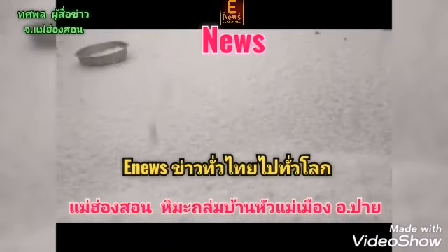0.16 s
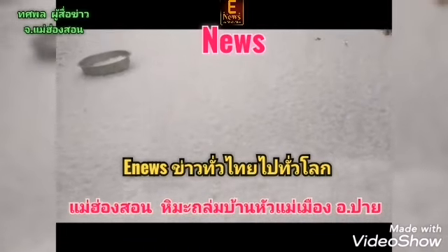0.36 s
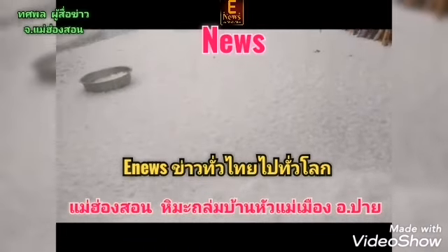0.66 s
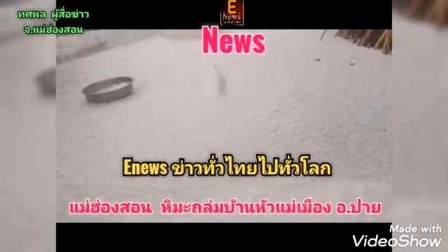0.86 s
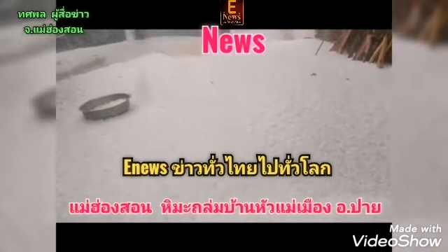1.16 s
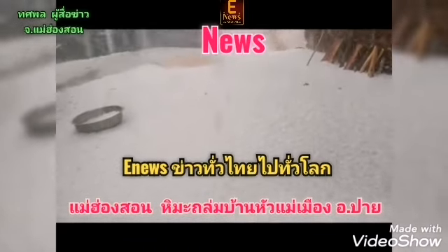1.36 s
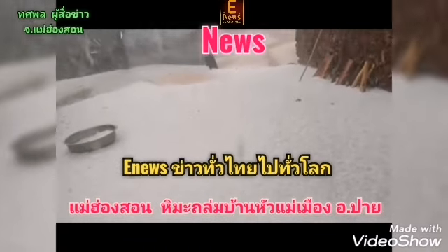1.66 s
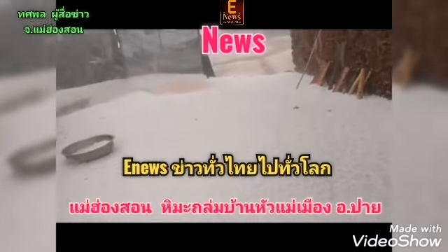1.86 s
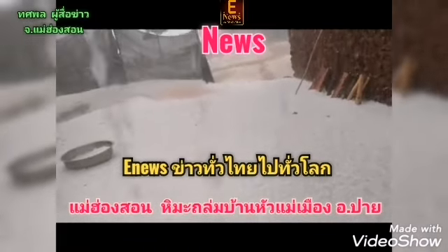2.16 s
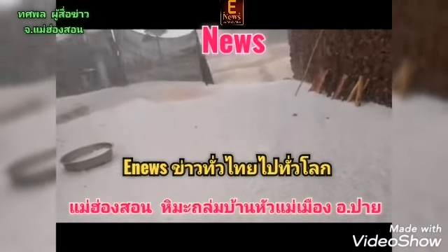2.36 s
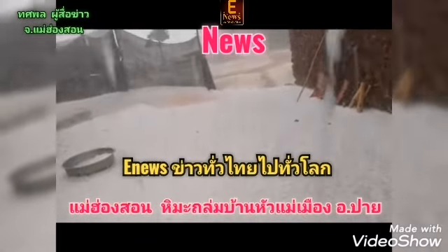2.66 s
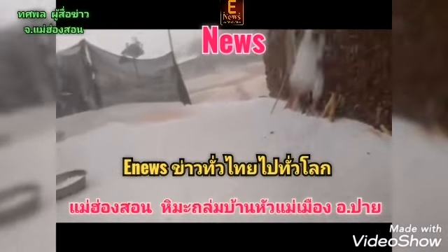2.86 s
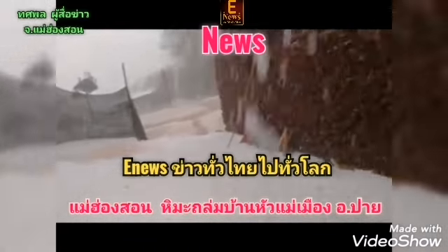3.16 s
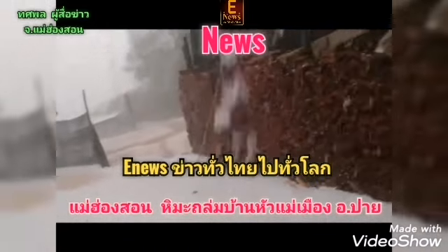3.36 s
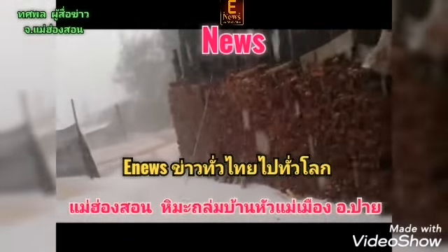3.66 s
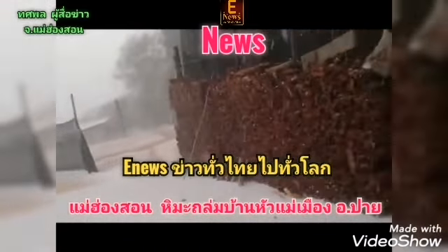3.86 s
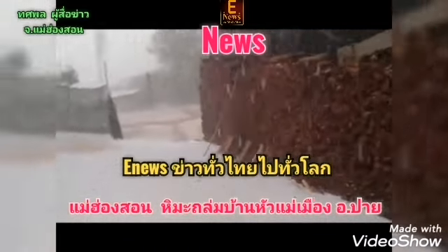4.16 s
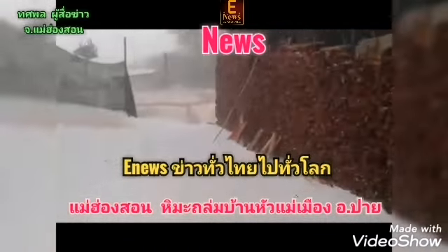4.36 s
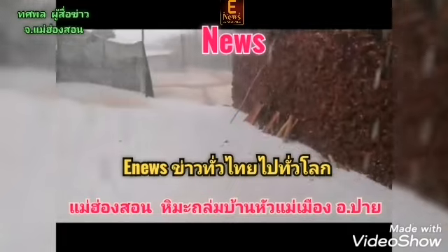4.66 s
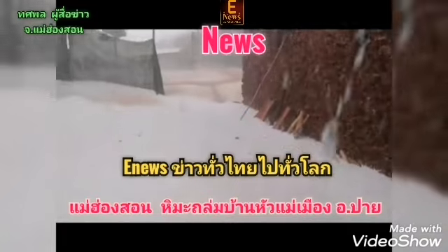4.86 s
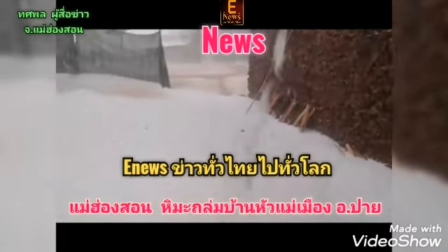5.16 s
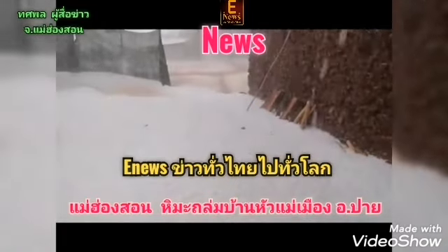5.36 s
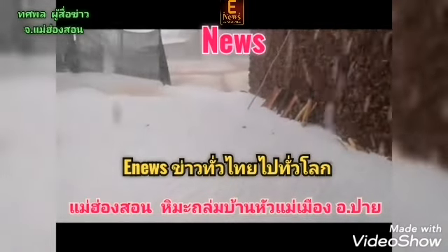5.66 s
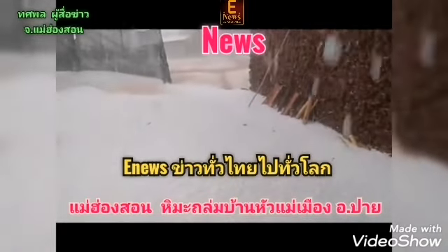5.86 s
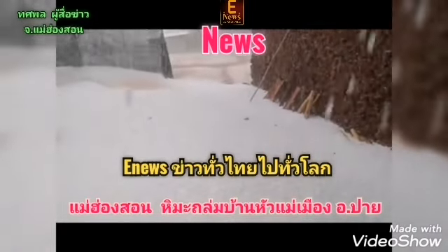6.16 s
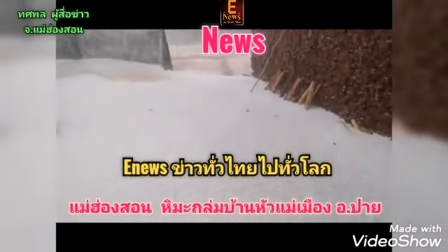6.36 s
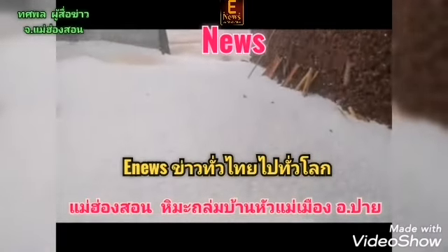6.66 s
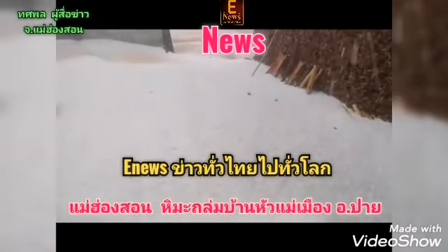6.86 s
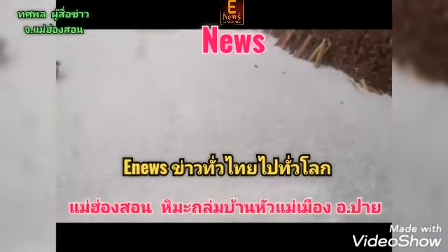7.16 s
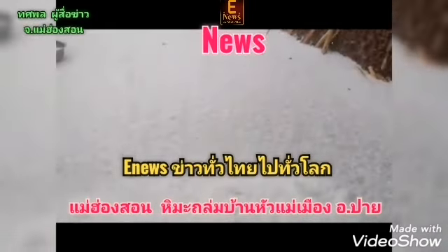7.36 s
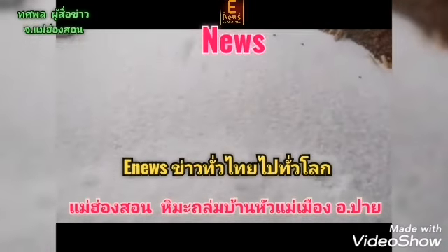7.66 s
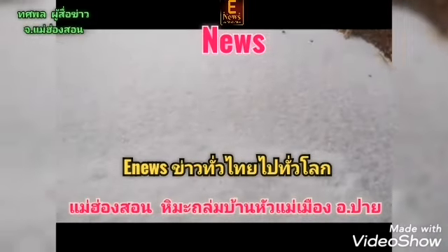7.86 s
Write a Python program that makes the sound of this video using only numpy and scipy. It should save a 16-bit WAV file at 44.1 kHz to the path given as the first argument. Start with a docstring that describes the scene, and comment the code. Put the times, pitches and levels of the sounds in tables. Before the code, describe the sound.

Heavy rain and hail hammer a corrugated metal roof, heard close from under the eave in a village yard. Countless stones merge into a loud, bright roar over a softer low drumming of the panels. Bigger stones stand out now and then as brief clatters and short metallic pings. Water and slush run off the roof and splatter on the hail below. The downpour holds a steady level throughout.

```python
"""A village yard, under the eave of a corrugated roof pelted by heavy rain and hail.
Thousands of stones a second make the sheets ring in one bright roar over a low drumming of the panels.
Volleys of bigger stones and single pings stand out. Water running off the roof splatters onto the hail
lying below, with clumps of slush and puffs of spray. A phone's gain control evens out the loudness."""
import sys
import numpy as np
from scipy import signal
from scipy.fft import rfft, irfft
from scipy.io import wavfile
from scipy.ndimage import uniform_filter1d

SR = 44100
rng = np.random.default_rng(int(sys.argv[2]) if len(sys.argv) > 2 else 0)


def transcribe(signal):
    """Save signal, clipped to [-1, 1], as a 16-bit WAV file at the path in sys.argv[1]."""
    frames = np.atleast_2d(signal).T
    limited = np.clip(frames, -1, 1)
    pcm = np.round(limited * 32767).astype(np.int16)
    wavfile.write(sys.argv[1], SR, pcm)


N = 352800  # 8 seconds
TIME = np.arange(N) / SR  # seconds at each sample


def undb(db):
    """Turn decibels (dB) into a number to multiply a sound by."""
    return 10 ** (np.asarray(db) / 20)


def unit(x):
    """Scale a signal so that its average power is 1."""
    return x / np.sqrt(np.mean(x ** 2))


def curve(table):
    """Join (seconds, value) points with straight lines, giving one value a sample."""
    seconds, values = np.transpose(table)
    return np.interp(TIME, seconds, values)


def drift(rate_hz):
    """A smooth random wobble of typical size 1 that swings up to about rate_hz times a second."""
    freqs = np.arange(N // 2 + 1) * SR / N
    return unit(irfft(rfft(rng.standard_normal(N)) / (1 + (freqs / rate_hz) ** 4), N))


def colour(x, points):
    """Make each frequency louder or softer, following (Hz, dB) points."""
    hz, db = np.transpose(points)
    freqs = np.maximum(np.arange(N // 2 + 1) * SR / N, 1)
    gain = undb(np.interp(np.log(freqs), np.log(hz), db))
    return irfft(rfft(x) * gain, N)


def resonate(x, hz, width_hz):
    """Keep the sound near one pitch; the narrower the width, the longer it rings."""
    b, a = signal.iirpeak(hz, hz / width_hz, fs=SR)
    return signal.lfilter(b, a, signal.lfilter(b, a, x))


def impacts(per_s, spread_db):
    """Clicks at random moments: with a positive spread many are small and a few large; with a negative spread
    most are full size and a few smaller."""
    hits = rng.random(N) < per_s / SR
    size = undb(spread_db * np.minimum(rng.exponential(size=N), 5))
    return unit(hits * size * rng.standard_normal(N))


def stereo(mid, side):
    """Left and right channels: both share mid, and side makes them differ."""
    return np.array([mid + side, mid - side])


def roof_roar():
    """Hail rings the metal sheets; where a stone lands decides which pitches it stirs."""
    # The broad tones of a struck sheet. Each row: pitch in Hz, width in Hz, relative level in dB.
    sheet_tones = [(1013, 475, -7), (1437, 770, -6.5), (1994, 810, 0.14), (2225, 330, -1.5),
                   (2463, 510, 0.04), (2703, 830, -2.5), (3730, 1590, -15)]
    roar = 0
    for hz, width_hz, db in sheet_tones:
        # each tone comes from its own stretch of roof, where flurries come and go
        flurry = undb(0.52 * drift(rate_hz=16))
        roar += undb(db) * flurry * resonate(impacts(per_s=18000, spread_db=0.54), hz, width_hz)
    # hard ice on metal also gives a short, bright crack
    cracks = resonate(impacts(per_s=10000, spread_db=4.0), hz=5400, width_hz=3300)
    return unit(roar) + undb(-32.5) * unit(cracks)


def small_stones(count, ring_samples):
    """Small stones each ring their own spot of roof: low ones knock, high ones ping."""
    # How strongly the roof rings at each pitch. Each row: pitch in Hz, relative level in dB.
    ring_levels = [(200, -19.5), (500, -17), (800, -14), (1050, -8.5), (1600, -6.5), (2000, -1), (2450, -1),
                   (2800, -4.5), (3400, -12)]
    pitches, levels = np.transpose(ring_levels)
    out = np.zeros(N + ring_samples)
    age = np.arange(ring_samples) / SR
    for when, where, strength in rng.random((count, 3)):
        start = int(when * N)
        hz = pitches[0] + where * (pitches[-1] - pitches[0])
        decay_s = 24 / max(hz, 1200)  # fades to about a third in 24 cycles, or 0.02 s at most
        ring = np.exp(-age / decay_s) * np.sin(2 * np.pi * hz * age)
        out[start:start + ring_samples] += undb(np.interp(hz, pitches, levels)) * strength * ring
    return unit(out[:N])


def drumming():
    """The heavier stones shake whole panels and the frame under them."""
    # How the panels and frame respond. Each row: frequency in Hz, relative level in dB.
    frame_response = [(15, 0), (42, -9.5), (76, -2.5), (95, -6.5), (115, -4), (160, -4), (230, -2),
                      (370, 0.5), (450, 0), (600, 1), (800, 1), (1300, -7.5), (3000, -48)]
    swell = undb(0.5 * drift(rate_hz=6))
    return unit(colour(swell * impacts(per_s=7000, spread_db=0.9), frame_response))


def splatter():
    """Water leaves the eave unevenly and bursts into droplets; the treble flickers band by band."""
    # The hiss of slush and water hitting the ground.
    # Each row: low edge in Hz, high edge in Hz, relative level in dB, amount of flicker in dB.
    splash_bands = [(4000, 4940, -7.5, 8.5), (4900, 5910, -4.5, 3), (5890, 7100, -5.5, 3.5),
                    (7210, 8210, -4.5, 2.5), (8130, 9000, -16.5, 13), (9180, 11040, -18, 9.5),
                    (10980, 12550, -17, 8.5)]
    # How much water runs off the eave. Each row: time in seconds, relative level in dB.
    runoff = [(0.0, -32), (1.16, -32.5), (1.8, -31.5), (2.56, -32), (4.4, -31.5), (4.84, -31.5),
              (5.12, -33), (5.36, -33), (5.96, -33), (6.2, -31.5), (8.0, -32)]
    wide_above_hz = 4100  # only the treble differs between the ears
    # near 2.84 s a thick stream pours close by, making the splatter duller and louder
    pour = np.exp(-((TIME - 2.84) / 0.41) ** 2)
    tilt_db = -0.5 + 4.5 * (TIME * SR / N) ** 2 - pour  # per octave: the splatter grows finer with time
    surge_db = 0.48 * drift(rate_hz=51)
    mid, side = 0, 0
    for low_hz, high_hz, db, flicker_db in splash_bands:
        band = signal.butter(6, [low_hz, high_hz], "band", fs=SR, output="sos")
        ahead = unit(signal.sosfilt(band, impacts(per_s=22000, spread_db=2.0)))
        around = unit(signal.sosfilt(band, impacts(per_s=22000, spread_db=2.0)))
        octaves = np.log2(low_hz / wide_above_hz)
        width = undb(min(-3 + 2.5 * octaves, -1.5))  # higher bands sound wider, up to a limit
        flicker = np.minimum(drift(rate_hz=22), 1)  # dips further than it rises
        gain = undb(db + tilt_db * (octaves - 1) + surge_db + flicker_db * flicker) / np.hypot(1, width)
        mid += gain * ahead
        side += gain * width * around
    treble_only = signal.ellip(10, .2, 80, wide_above_hz, "high", fs=SR, output="sos")
    level_db = curve(runoff) - 3 + 0.8 * pour
    return undb(level_db) * stereo(mid, signal.sosfilt(treble_only, side))


def sizzle():
    """A thin, steady sizzle at the very top of the hiss, partly different in each ear."""
    mid, side = (unit(resonate(rng.standard_normal(N), hz=12410, width_hz=50)) for _ in range(2))
    return undb(-50) * stereo(mid, undb(-1) * side)


def slush_clumps():
    """A lump of slush collapses into a short burst of droplets; finer ones sound higher."""
    # Clumps landing close by. Each row: time in seconds, pitch in Hz, level in dB.
    clumps = [(.04, 6000, -37.5), (.365, 4700, -34), (.586, 5800, -34), (1.28, 4000, -34),
              (1.467, 6200, -34), (1.607, 4000, -37), (1.942, 5500, -42), (2.04, 3900, -36),
              (2.615, 4600, -31), (2.722, 5200, -34), (3.0, 5900, -37), (3.167, 4000, -35),
              (3.39, 5500, -33), (3.686, 4900, -32), (4.573, 6000, -37), (4.8, 4200, -35),
              (5.345, 5200, -33), (5.352, 7800, -38), (5.393, 6200, -35.5), (6.202, 5700, -36.5),
              (6.532, 4200, -33), (6.85, 3900, -35), (6.976, 5670, -35), (7.25, 6200, -40),
              (7.425, 4000, -33), (7.943, 5200, -35)]
    lead_s, rise_s = 0.0074, 0.012
    out = np.zeros(N)
    for time_s, hz, db in clumps:
        age = np.maximum(TIME - time_s + lead_s, 0) / rise_s
        droplets = unit(resonate(impacts(per_s=4000, spread_db=0.5), hz, width_hz=1800))
        out += undb(db) * age * np.exp(1 - age) * droplets
    return out


def volleys():
    """A bunch of big stones lands on one sheet within a few hundredths of a second and rings it."""
    # Bunches of big stones. Each row: middle of the bunch in seconds, pitch in Hz, level in dB.
    bunches = [(0.048, 2500, -17.5), (0.168, 2800, -23), (0.384, 3300, -28.5), (0.48, 2150, -23),
               (0.514, 2530, -16), (1.3, 2420, -24), (1.72, 2380, -23), (1.618, 2756, -22),
               (1.994, 2300, -22), (2.03, 1500, -22), (2.048, 3140, -25), (2.518, 2080, -23),
               (2.545, 3300, -30), (2.587, 2400, -31), (2.739, 2400, -19), (2.93, 1950, -17),
               (3.228, 2350, -22), (3.57, 2270, -18.5), (3.735, 2360, -19), (3.95, 3300, -27),
               (4.0, 2800, -25), (4.059, 3020, -28.5), (4.155, 2050, -19), (4.519, 2540, -24),
               (4.616, 2454, -20), (5.0, 2400, -25), (5.02, 3280, -30), (5.357, 3300, -28),
               (5.641, 2530, -24), (6.229, 2160, -21), (6.596, 3280, -33)]
    half_length_s = 0.02
    out = np.zeros(N)
    for middle_s, hz, db in bunches:
        swell = np.exp(-((TIME - middle_s) / half_length_s) ** 2)
        ringing = unit(resonate(impacts(per_s=3000, spread_db=-0.2), hz, width_hz=600))
        out += undb(db) * swell * ringing
    return out


def pings():
    """One stone strikes the sheet overhead and leaves a short metallic ring."""
    # Single stones on the nearest sheet. Each row: start in seconds, pitch in Hz, peak level in dB.
    strikes = [(0.19, 1966, -14), (0.505, 2660, -15), (0.988, 1614, -21), (2.014, 3250, -27),
               (3.484, 1593, -20), (3.621, 2000, -19), (4.144, 2410, -26), (4.606, 2454, -19),
               (4.775, 1900, -17), (5.631, 3000, -18), (6.627, 2411, -12), (6.828, 2777, -17),
               (7.728, 2970, -19)]
    decay_s = 0.015
    out = np.zeros(N)
    for start_s, hz, db in strikes:
        age = np.maximum(TIME - start_s, 0)
        out += undb(db) * np.exp(-age / decay_s) * np.sin(2 * np.pi * hz * age)
    return out


def sprays():
    """A drop bursts on the ice close by into a short puff of fine spray."""
    # Puffs of spray. Each row: loudest moment in seconds, level in dB.
    puffs = [(0.326, -44), (0.415, -39), (0.848, -44), (1.477, -47), (2.238, -40), (2.379, -43),
             (2.493, -41), (3.003, -47), (3.376, -44), (3.535, -49), (3.65, -44), (3.909, -44), (4.35, -39),
             (4.651, -45), (4.776, -43), (4.85, -44), (5.12, -45), (6.695, -37), (6.85, -48), (7.6, -46)]
    rise_s = 0.0058
    loudness = np.zeros(N)
    for peak_s, db in puffs:
        age = np.maximum((TIME - peak_s) / rise_s + 1, 0)
        loudness += undb(db) * age * np.exp(1 - age)
    return loudness * unit(resonate(rng.standard_normal(N), hz=11000, width_hz=4900))


def scene():
    """The storm drives the roar and drumming overhead, while water and slush land below."""
    # How hard the hail falls. Each row: time in seconds, relative level in dB.
    storm = [(0.0, -17), (0.2, -17.5), (0.35, -17), (0.48, -18), (0.6, -18.5), (0.76, -18), (1.0, -17.5),
             (1.18, -18.6), (1.3, -17.5), (2.0, -17.5), (2.3, -18.5), (2.56, -17), (2.8, -18),
             (2.95, -17.5), (3.15, -17.5), (3.42, -18), (3.7, -17.5), (3.9, -17.5), (4.3, -17.5),
             (4.42, -18.5), (4.6, -17.1), (4.83, -18.5), (4.91, -20), (5.02, -17.5), (5.2, -19.5),
             (5.35, -18.5), (5.55, -18), (5.7, -17.5), (5.92, -19), (6.1, -18), (6.24, -17.5),
             (6.42, -18.5), (6.88, -18), (7.08, -18.4), (7.4, -18.5), (7.55, -18.6), (7.75, -18),
             (8.0, -19)]
    storm_db = curve(storm) + 0.25 * drift(rate_hz=14)  # small gusts sweep the whole roof
    roof = undb(0.27) * roof_roar()
    roof += undb(-9.5) * small_stones(count=2400, ring_samples=4096)
    roof += undb(-16.5) * drumming()
    return undb(storm_db) * roof + splatter() + volleys() + pings() + slush_clumps() + sprays() + sizzle()


def gain_control(x, window_s, strength):
    """Turn the sound down when it is briefly louder than its running average, and up when softer."""
    power = np.mean(x ** 2, axis=0)
    fast = uniform_filter1d(power, int(window_s * SR))
    slow = uniform_filter1d(power, SR // 8)
    return x * (slow / fast) ** (strength / 2)


def record(dry):
    """The phone evens the level, rounds off peaks shared by both ears and cuts the highest treble."""
    even = gain_control(dry, window_s=0.015, strength=0.41)
    centre = even.mean(axis=0)
    ceiling, top_hz = undb(-4.3), 12900
    rounded = centre / (1 + (centre / ceiling) ** 4) ** (1 / 4)
    treble_cut = signal.ellip(8, .2, 70, top_hz, fs=SR, output="sos")
    return signal.sosfilt(treble_cut, even - centre + rounded)


dry = scene()
out = record(dry)
transcribe(out)
```